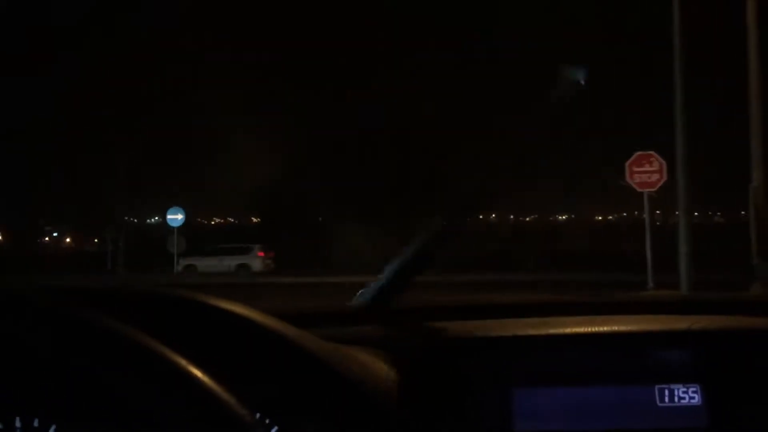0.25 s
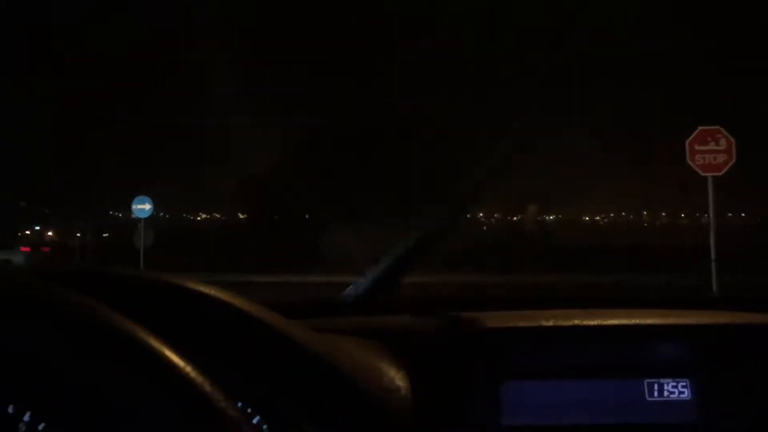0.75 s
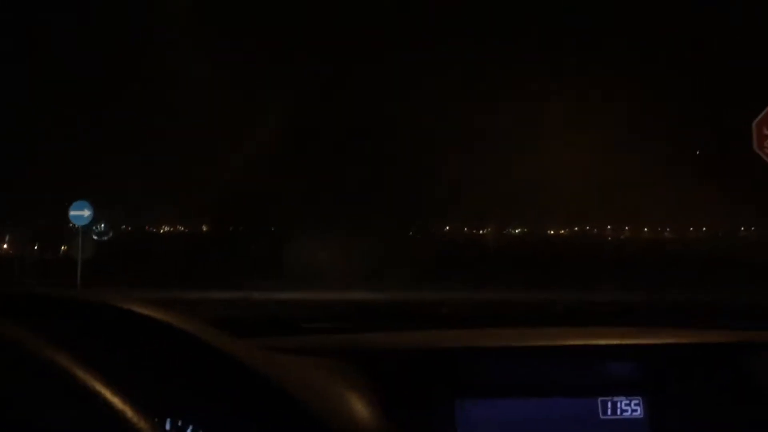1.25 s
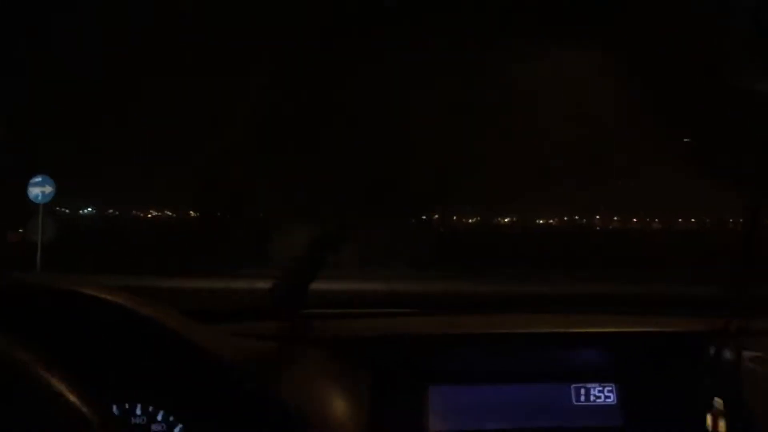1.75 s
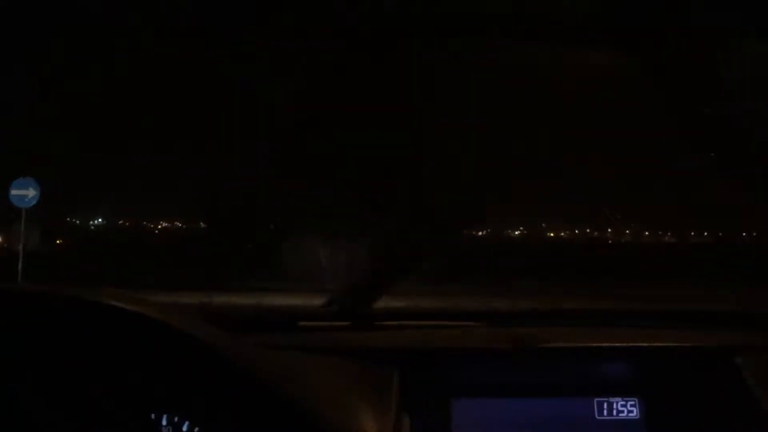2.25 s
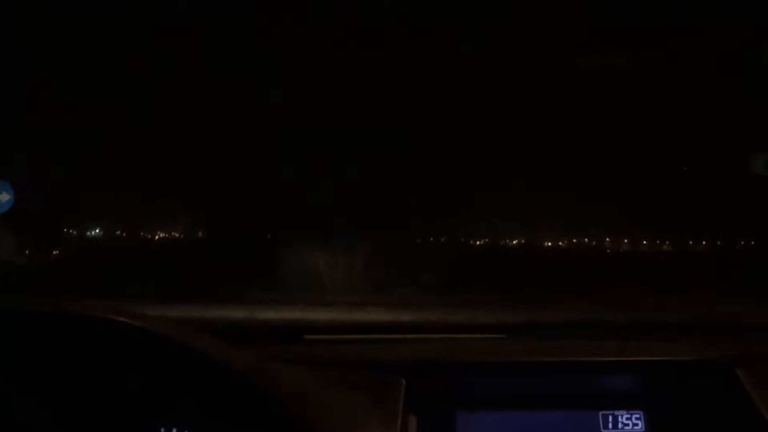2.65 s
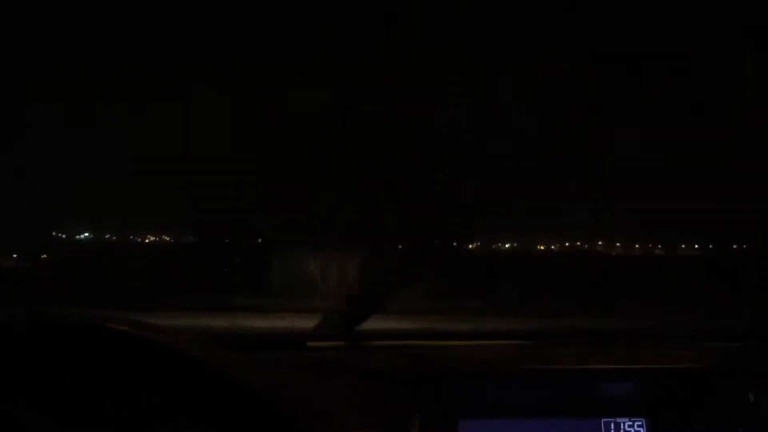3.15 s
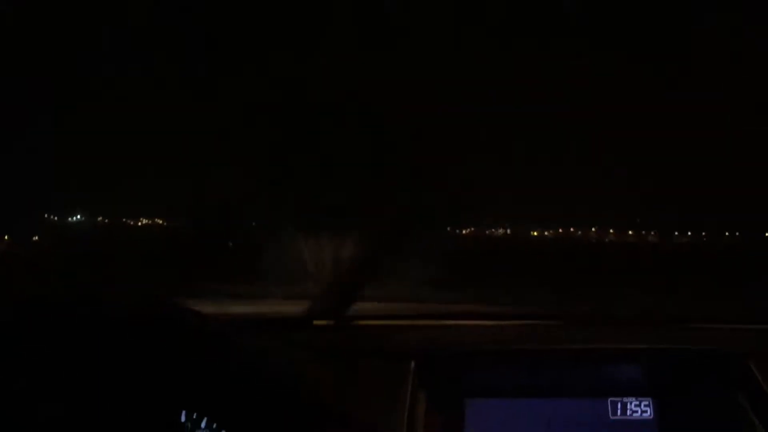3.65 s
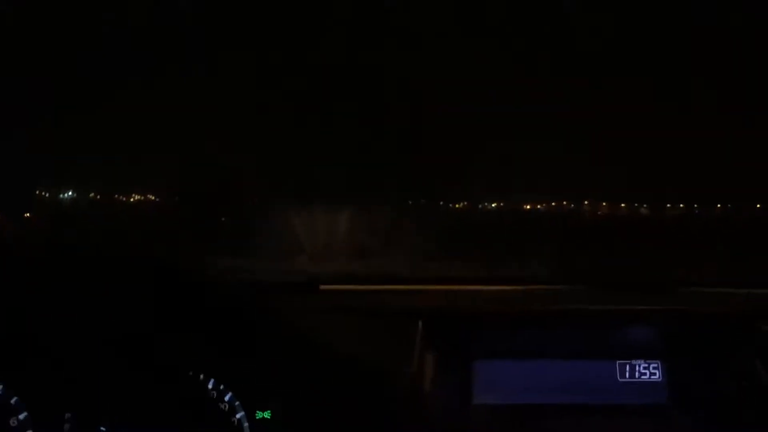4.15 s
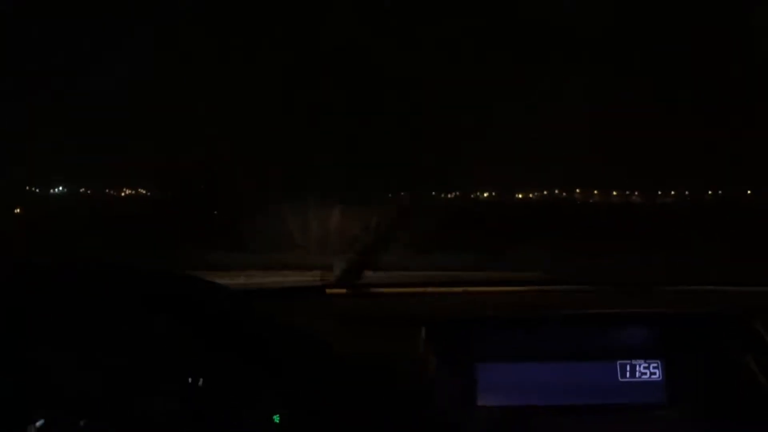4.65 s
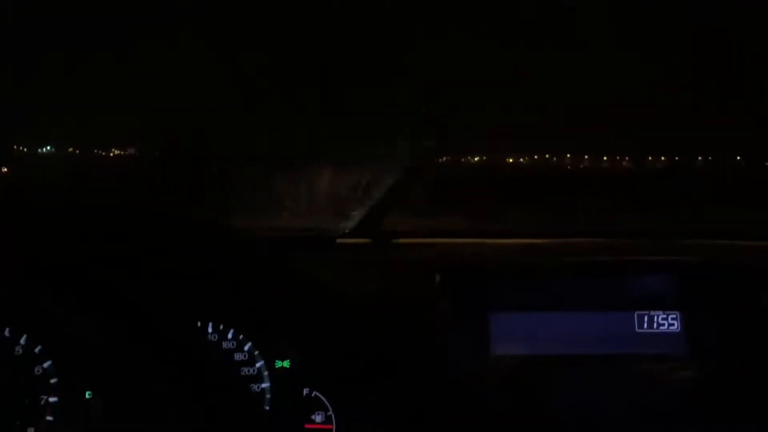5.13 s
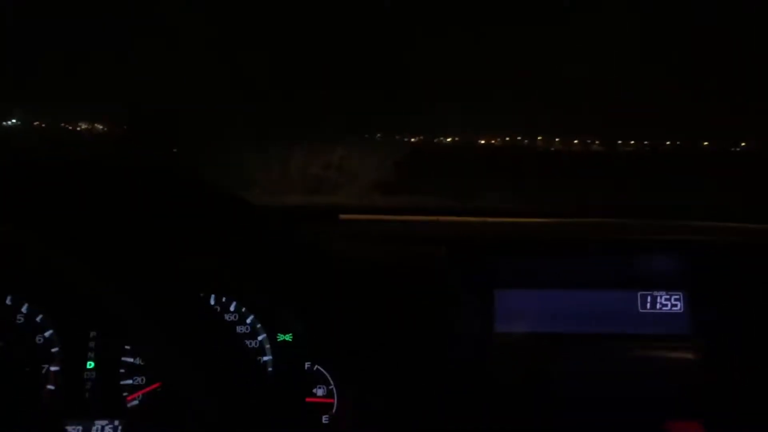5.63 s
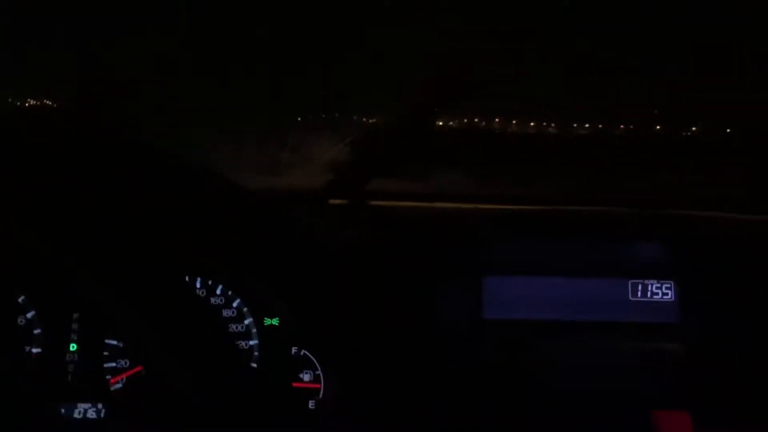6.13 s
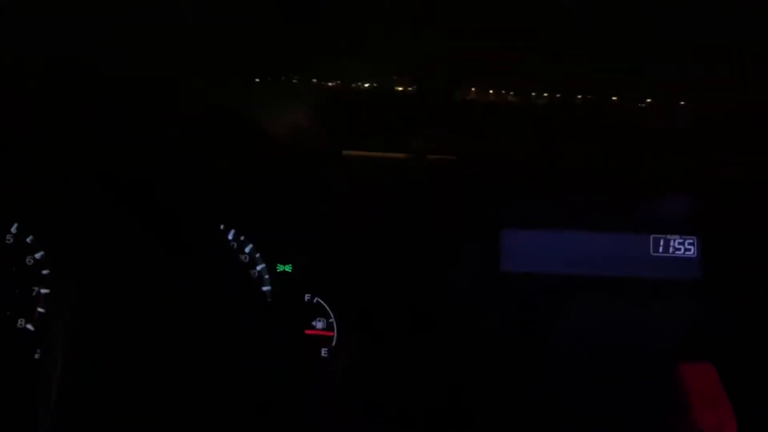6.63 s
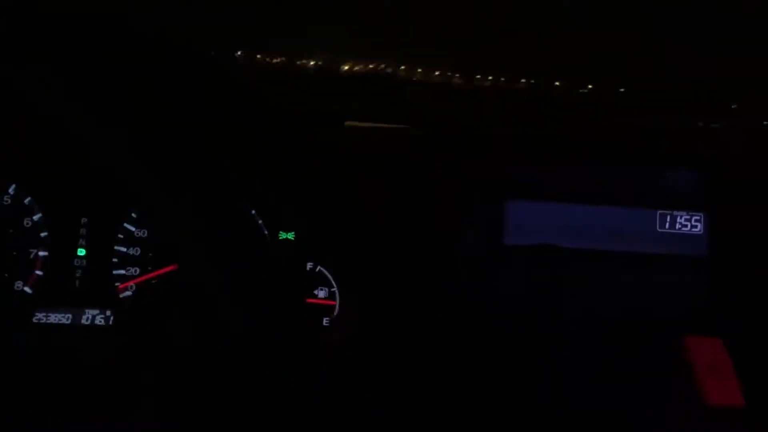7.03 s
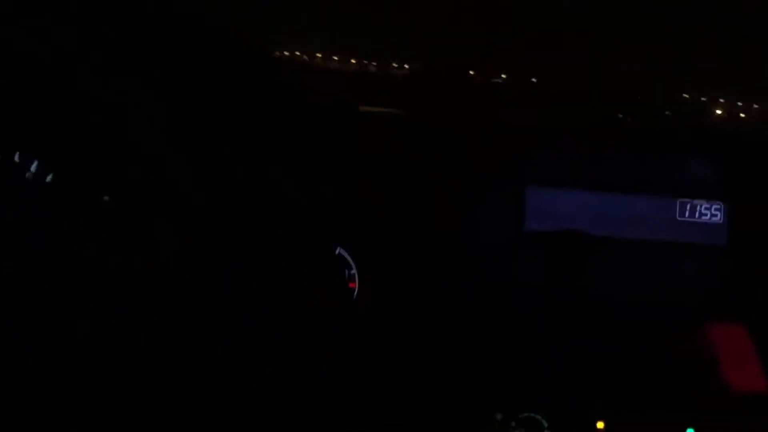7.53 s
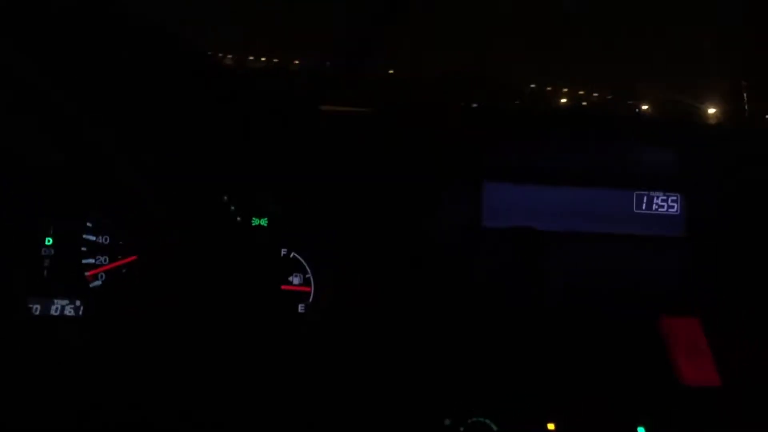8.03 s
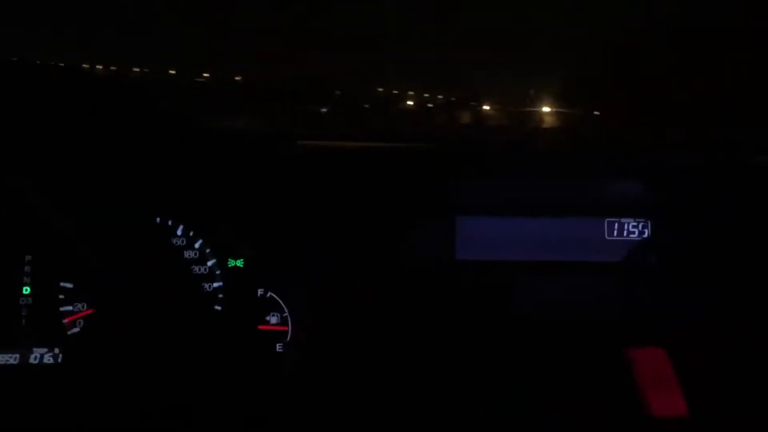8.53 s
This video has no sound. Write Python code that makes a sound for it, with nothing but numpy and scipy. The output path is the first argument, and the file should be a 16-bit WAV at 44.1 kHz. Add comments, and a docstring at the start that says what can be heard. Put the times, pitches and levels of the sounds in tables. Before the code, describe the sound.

A car cabin at night, captured by a phone near the driver. Heavy drops crackle densely on the glass at first, then rain becomes patchier, with soft splats and roof patter. Regular wiper knocks shake the panels with rubbery scuffs. Beneath, tyres rumble and a tonal hum falls in pitch and fades; the engine dips low, then climbs again towards the end.

```python
"""Rainy night drive

Inside a car that slows at a junction and pulls away again: tyres rumble and their tread hum sinks in pitch.
The engine drones as a stack of sine tones, and small metal pieces jingle faintly as fading high tones.
Wipers thump and scuff at each end of their sweep: short pushes and noise that shake the car's panels.
Rain patters on the roof and ticks on the windscreen: many short noise bursts, each with its own ring."""
import sys
import numpy as np
from scipy import signal
from scipy.fft import rfft, irfft
from scipy.io import wavfile
from scipy.ndimage import uniform_filter1d

SR = 44100
rng = np.random.default_rng(int(sys.argv[2]) if len(sys.argv) > 2 else 0)


def store_pcm(level_fs):
    """Save levels as 16-bit WAV."""
    pcm = np.round(np.clip(level_fs, -1, 1) * 32767).astype(np.int16)
    wavfile.write(sys.argv[1], SR, np.atleast_2d(pcm).T)


N = 387198
TIME = np.arange(N) / SR  # seconds


def undb(db):
    """Turn decibels into gain."""
    return 10 ** (np.asarray(db) / 20)


def unit(x):
    """Scale a sound to an rms of 1."""
    return x / np.sqrt(np.mean(x ** 2))


def unit_energy(x):
    """Scale a short sound to an energy of 1."""
    return x / np.linalg.norm(x)


def curves(table):
    """Draw straight lines between the rows of a table: one value per sample for each column."""
    seconds, *columns = np.transpose(table)
    return [np.interp(TIME, seconds, column) for column in columns]


def add(out, seconds, sound):
    """Mix a sound in at a given time."""
    start = int(np.clip(seconds * SR, 0, N - 1))
    out[start:start + len(sound)] += sound[:N - start]


def walk(rate):
    """Smooth random wander with a spread of about 1; a higher rate wanders faster."""
    hold = int(SR / rate)
    steps = np.repeat(rng.standard_normal(N // hold + 1), hold)
    smooth = uniform_filter1d(uniform_filter1d(steps, hold), hold)
    return unit(smooth[:N])


def fade(t, t60):
    """Exponential decay that falls by 60 dB in t60 seconds."""
    return np.exp(-np.log(1000) * t / t60)


def swell(seconds, spread_s):
    """A bell-shaped rise and fall around a time."""
    return np.exp(-np.minimum(((TIME - seconds) / spread_s) ** 2 / 2, 20))


def lowpass(x, order, hz):
    """Soften the sound above a frequency."""
    return signal.sosfilt(signal.butter(order, hz, fs=SR, output="sos"), x)


def highpass(x, order, hz):
    """Thin out the sound below a frequency."""
    return signal.sosfilt(signal.butter(order, hz, "high", fs=SR, output="sos"), x)


def colour(x, points, size=8192):
    """Filter with the given (frequency, level) outline and unit power gain, never sounding ahead of time."""
    hz, db = np.transpose(points)
    grid = np.maximum(np.arange(size // 2 + 1) * SR / size, 1)
    outline_db = np.interp(np.log(grid), np.log(hz), db)
    # folding the cepstrum forward puts the response as early as it can be
    cepstrum = irfft(np.log(undb(outline_db)))
    cepstrum[1:size // 2] *= 2
    cepstrum[size // 2 + 1:] = 0
    response = irfft(np.exp(rfft(cepstrum)))
    return signal.fftconvolve(x, unit_energy(response))[:len(x)]


def resonance(x, hz, width_hz):
    """One damped ringing tone (a mode), with unit power gain."""
    b, a = signal.iirpeak(min(hz, .45 * SR), hz / width_hz, fs=SR)
    return signal.lfilter(b, a, x) * np.sqrt(SR / (np.pi * width_hz))


# how loud the road is, before a small lift and wander: (time [s], level [dB])
ROAD_LEVEL = [(0, -27), (0.7, -30.5), (1.25, -26.5), (1.7, -30), (2.2, -30), (3.8, -34), (5.3, -37),
              (5.9, -32.5), (6.3, -36), (6.9, -31.5), (7.5, -34), (8.3, -33.5), (8.78, -32)]
# tone of the rumble inside the car: (frequency [Hz], level [dB])
ROAD_COLOUR = [(20, -20), (35, 1), (50, 0.5), (65, 1.5), (85, -4.5), (120, 2.5), (150, -4.5), (210, -12.5),
               (300, -21), (390, -18.5), (600, -30), (1200, -42), (4000, -69.5), (16000, -66.5)]


def tyres():
    """The rough road shakes the tyres at random, and the body passes on mostly the lows."""
    level_db, = curves(ROAD_LEVEL)
    rumble = colour(rng.standard_normal(N), ROAD_COLOUR)
    return rumble * undb(level_db + 1.5 + 1.0 * walk(9.1))


# tread tones at the starting speed, before the gains below: (frequency [Hz], level [dB])
TREAD_TONES = [(362, -54), (388, -50.5), (410, -47), (470, -52), (525, -49.5), (575, -59), (650, -48.5)]
# the tread hum builds up as the brakes bite: (time [s], level [dB])
BRAKING = [(0, -15), (0.3, -4), (0.6, 2.5), (1.0, 0.5), (2.0, -1.5), (2.7, -7)]
SLOWING_PER_S = 0.14  # share of the starting speed lost each second
BOOM_HZ, BOOM_WIDTH_HZ = 380, 120  # the cabin resonance that brings the hum out


def tread():
    """Tread tones sink as the car slows; each is stronger when near a cabin resonance."""
    speed = np.maximum(1 - SLOWING_PER_S * TIME, .3)  # share of the starting speed
    hum = 0
    for start_hz, level_db in TREAD_TONES:
        hz = start_hz * speed * (1 + .008 * walk(18))
        boom = 1 / np.hypot(1, 2 * (hz - BOOM_HZ) / BOOM_WIDTH_HZ)
        tone = np.sin(2 * np.pi * np.cumsum(hz) / SR)
        hum = hum + undb(level_db + 2.2 * walk(9.87)) * speed * boom * tone
    braking_db, = curves(BRAKING)
    return np.sqrt(2) * hum * undb(braking_db)


# engine: (time [s], firing rate [Hz], level [dB], extra level of the overtones [dB])
ENGINE = [(0, 73.05, -34, -1.5), (.7, 67, -38, 5.5), (2.25, 75.8, -35.5, -8.5), (3, 75.23, -30, -8.5),
          (3.3, 69.56, -34, -7), (3.7, 60.1, -46, 1), (4.5, 55.03, -43.5, 4), (5.1, 53.98, -36, -5),
          (5.9, 59.73, -39, 7), (6.4, 62.08, -29.5, -4.5), (6.9, 63.23, -32, -8.5),
          (7.5, 62.27, -30.5, -20), (8.15, 71.7, -32, -10), (8.45, 84.8, -34.5, -6.5),
          (8.78, 86.8, -30.5, -29)]
# engine orders: (multiple of the firing rate, level [dB])
ENGINE_ORDERS = [(1, 0), (2, -7.5), (3, -12), (4, -15.5)]
DRONE_HZ, DRONE_WIDTH_HZ, DRONE_DB = 244.3, 22, 6  # a cabin resonance lifts any order passing through


def engine():
    """Each firing pushes the air, so the firing rate and its multiples boom in the cabin."""
    firing_hz, level_db, overtones_db = curves(ENGINE)
    phase = 2 * np.pi * np.cumsum(firing_hz * (1 + 0.0071 * walk(14))) / SR
    drone = 0
    for multiple, order_db in ENGINE_ORDERS:
        waver_db = 2.1 * walk(9)
        off_centre = 2 * (multiple * firing_hz - DRONE_HZ) / DRONE_WIDTH_HZ
        boom_db = DRONE_DB / (1 + off_centre ** 2)
        tone_db = level_db + order_db + overtones_db * (multiple > 1) + boom_db + waver_db
        drone = drone + undb(tone_db) * np.sin(multiple * phase)
    return np.sqrt(2) * drone


# faint jingles of small metal pieces: (time [s], energy [dB])
TINKLES = [(3.495, -25.5), (3.512, -32), (3.549, -25.5), (4.144, -28), (4.163, -31), (4.232, -31),
           (4.863, -25), (5.438, -30)]
# ringing tones of the metal: (frequency [Hz], level [dB], time to fall 60 dB [s])
METAL_MODES = [(5450, -5, .04), (6100, -7, .04), (6662, -5, 0.078), (8550, -1, .02), (9100, 5, 0.028),
               (9450, -1, .02), (9940, 2, .04), (10600, -2, .022), (11100, -2, .022), (11750, -9, .025),
               (12500, -9, .025), (13300, -10, .03), (15000, -12, .025)]
METAL_SCATTER_DB = 5  # every touch favours other modes
METAL_DETUNE = 0.022  # the pieces differ a little in pitch, as a share
METAL_ECHO_T60_S = 0.02  # the cabin blurs their ring


def tinkles():
    """Small pieces of metal touch and ring briefly in many high modes."""
    hz, mode_db, t60 = np.transpose(METAL_MODES)[:, :, None]
    t = TIME[:SR // 5]
    out = np.zeros(N)
    for seconds, energy_db in TINKLES:
        size, detune, angle = rng.standard_normal((3, len(hz), 1))
        phase = 2 * np.pi * (hz * (1 + METAL_DETUNE * detune) * t + angle)
        gains = undb(mode_db + METAL_SCATTER_DB * size)
        ring = np.sum(gains * fade(t, t60) * np.sin(phase), axis=0)
        echo = rng.standard_normal(len(t)) * fade(t, METAL_ECHO_T60_S)
        ring = signal.fftconvolve(ring, echo)
        add(out, seconds, unit_energy(ring) * undb(energy_db))
    return out


def ringing(hz, width_hz, t60, rise_s, size=6000):
    """A short burst of shaking around one pitch: it rises steadily, then dies away."""
    t = np.arange(size) / SR
    edges = [hz - width_hz / 2, hz + width_hz / 2]
    band = signal.butter(2, edges, "band", fs=SR, output="sos")
    shaking = unit(signal.sosfilt(band, rng.standard_normal(size)))
    return shaking * np.minimum(t / rise_s, fade(t - rise_s, t60))


# soft splats of water on the body: (time [s], level [dB], pitch [Hz], rise [s])
SPLATS = [(0.13, -38, 1250, 0.026), (1.437, -36.5, 1320, .002), (1.75, -43.5, 1190, 0.012),
          (2.8, -43, 1290, .008), (3.675, -41, 1302, .01), (4.89, -38, 2100, 0.011),
          (4.955, -43, 1460, 0.0049), (6.078, -40, 1310, 0.011), (6.458, -34, 1142, 0.014),
          (7.289, -45, 1000, 0.0043), (7.789, -39, 1303, 0.013), (7.865, -45, 1200, 0.019),
          (8.012, -36.5, 1270, 0.027), (8.38, -32.5, 1500, 0.0065), (8.405, -41, 1140, .006)]


def splats():
    """Larger blobs of water spread softly on the body and ring it in a broad band."""
    out = np.zeros(N)
    for seconds, level_db, hz, rise_s in SPLATS:
        splat = ringing(hz, width_hz=1070, t60=0.12, rise_s=rise_s)
        add(out, seconds, splat * undb(level_db))
    return out


# wiper turns, top and bottom of the sweep in alternation; also used by wipers():
# (time [s], force of the knocks and drag [dB], force of the scuffs [dB])
TURNS = [(0.697, 1, -6), (1.414, -2, -2.5), (2.163, -1, -3.5), (2.88, -3, -1.5), (3.629, 0, 1),
         (4.346, -2.5, -1), (5.095, -1, -1), (5.812, 0.5, -3.5), (6.561, 1.5, 1.5), (7.278, -1, 0),
         (8.027, 0.5, 3), (8.744, -0.5, 0)]
# scuffs around each turn, before its force: (time after the turn [s], level [dB], spread [s])
SCUFFS = [(-.17, -53, 0.036), (-.087, -42.5, .012), (-.002, -39.5, .02)]
# tone of the scuffs: (frequency [Hz], level [dB])
SCUFF_COLOUR = [(200, -32.5), (330, -1.5), (450, 1.5), (560, -1.5), (720, -9), (1000, -9.5), (1500, -15.5),
                (2500, -26), (6000, -35), (16000, -60)]
SCUFF_SLIPS_PER_S = 1500


def scuffs():
    """The rubber lips flip over in a rush of tiny slips on the wet glass."""
    slips = rng.standard_normal(N) * (rng.random(N) < SCUFF_SLIPS_PER_S / SR)
    force = np.zeros(N)
    for turn, _, force_db in TURNS:
        for after, level_db, spread_s in SCUFFS:
            force += undb(level_db + force_db) * swell(turn + after, spread_s)
    return colour(unit(slips), SCUFF_COLOUR) * force


# ringing tones of the cowl (the panel under the wipers) and cabin:
# (frequency [Hz], width [Hz], level at the top turn [dB], level at the bottom turn [dB])
COWL_MODES = [(89, 29, -7, 0), (125.7, 22.3, 8, 4), (168, 24, -5.5, 3), (242.6, 21, -23, -2),
              (374, 120, -14, -4.5), (530, 210, -17, -11)]


def cowl(push, mode_db):
    """The cowl and cabin answer a push from the wipers in several modes."""
    gains = unit_energy(undb(mode_db))
    return sum(gain * resonance(push, hz, width_hz)
               for (hz, width_hz, *_), gain in zip(COWL_MODES, gains))


def judder(mode_db):
    """Rubber stutters on the glass in random kicks and shakes the cowl with an even force."""
    kicks = rng.standard_normal(N) * (rng.random(N) < 500 / SR)  # about 500 a second
    shake = cowl(kicks, mode_db)
    return shake / np.sqrt(uniform_filter1d(shake ** 2, int(.06 * SR)) + 1e-12)


# drag of the blades before the turn's force: (level at the top turn [dB], level at the bottom turn [dB])
DRAG_LEVELS = [-27, -32.5]
# knocks of linkage, arms and blades, one list for the top turn and one for the bottom turn,
# before the force, lift and scatter: (time after the turn [s], energy [dB])
KNOCKS = [
    [(-0.081, -7), (-0.0235, 2), (0.0008, 4), (0.0165, -1), (0.052, -1)],
    [(-0.099, -10), (-0.022, -0.5), (-0.005, -6.5), (0.0115, 1.5), (0.05, -17)],
]
DRAG_LEAD_S, DRAG_SPREAD_S = 0.036, 0.089  # the drag peaks just before the turn
KNOCK_LIFT_DB, KNOCK_SCATTER_DB, KNOCK_JITTER_S = 4, 1.0, 0.00038
RUBBER_SOFT_HZ = 290  # the sound is softened above this


def wipers():
    """The blades drag as they slow down, then arms and blades knock over at each end of the sweep."""
    _, _, *mode_db = np.transpose(COWL_MODES)
    out = np.zeros(N)
    for end, (drag_db, knocks, end_db) in enumerate(zip(DRAG_LEVELS, KNOCKS, mode_db)):
        pushes, drag = np.zeros(N), np.zeros(N)
        for turn, force_db, _ in TURNS[end::2]:
            chances = rng.standard_normal((len(knocks), 2))
            for (after, energy_db), (late, hard) in zip(knocks, chances):
                if turn + after < N / SR:
                    push_db = energy_db + force_db + KNOCK_LIFT_DB + KNOCK_SCATTER_DB * hard
                    add(pushes, turn + after + KNOCK_JITTER_S * late, undb([push_db]))
            drag += undb(drag_db + force_db) * swell(turn - DRAG_LEAD_S, DRAG_SPREAD_S)
        out += cowl(pushes, end_db) + drag * judder(end_db)
    return lowpass(out, 3, RUBBER_SOFT_HZ)


# light rain that goes on in the lulls, before the trims below:
# (time [s], level on the glass [dB], level on the roof [dB])
DRIZZLE = [(0, -61, -55), (1.2, -66, -55), (1.5, -59, -52.5), (1.8, -62, -58), (2.2, -55, -56),
           (2.55, -64, -59), (2.75, -72, -59), (3.8, -66, -52.5), (5.2, -69, -55), (6.4, -60, -52),
           (7.5, -63, -55), (7.85, -59.5, -51), (8.78, -56, -55)]
# flurries with short lulls between, before the trims below:
# (start time [s], length [s], level on the glass [dB], level on the roof [dB])
FLURRIES = [(0.01, 0.037, -51, -67), (0.129, 0.085, -47.5, -48.5), (0.246, 0.48, -46.5, -52.5),
            (0.739, 0.17, -52, -54), (0.941, 0.25, -48, -49), (1.194, 0.035, -66, -52),
            (1.269, 0.12, -51, -62), (1.44, 0.16, -54, -47.5), (1.96, 0.14, -47, -49),
            (2.203, 0.056, -43, -54), (2.31, 0.1, -49.5, -48.5), (2.625, 0.01, -50, -52.5),
            (2.78, 0.14, -48, -47.5), (2.942, 0.083, -46.5, -46), (3.049, 0.2, -49, -48),
            (3.307, 0.068, -43.5, -47), (3.42, 0.078, -66, -45), (3.612, 0.17, -64, -49),
            (3.822, 0.095, -49.5, -49), (3.926, 0.15, -52, -47.5), (4.084, 0.27, -54, -48.5),
            (4.407, 0.08, -56, -48.5), (4.565, 0.15, -55.5, -54), (4.752, 0.097, -65, -51.5),
            (4.872, 0.18, -59, -50.5), (5.223, 0.27, -67, -59.5), (5.458, 0.098, -53.5, -61),
            (5.6, 0.19, -55, -50.5), (5.869, 0.15, -60.5, -49.5), (6.074, 0.04, -47.5, -42.5),
            (6.442, 0.29, -60, -50), (6.812, 0.21, -55, -49.5), (7.11, 0.26, -66, -49),
            (7.547, 0.028, -57, -46.5), (7.67, 0.019, -46, -56), (7.798, 0.055, -74, -50.5),
            (7.988, 0.18, -52.5, -52), (8.281, 0.64, -58, -49)]
FLURRY_ATTACK_S, FLURRY_RELEASE_S = 0.011, 0.028
PATCHY_DB, PATCHY_PER_S = 2, 25  # the rain comes unevenly
GLASS_TRIM_DB, ROOF_TRIM_DB = -1.13, -1.0


def rainfall():
    """Rain level in dB on glass and roof: drizzle plus flurries that set in quickly, hold and die away."""
    power = undb(curves(DRIZZLE)) ** 2
    for start, length, glass_db, roof_db in FLURRIES:
        end = start + length
        corners = [start - FLURRY_ATTACK_S, start, end, end + FLURRY_RELEASE_S]
        shape = np.interp(TIME, corners, [0, 1, 1, 0])
        power += np.outer(undb([glass_db, roof_db]) ** 2, shape ** 2)
    glass_db, roof_db = 10 * np.log10(power) + PATCHY_DB * walk(PATCHY_PER_S)
    return glass_db + GLASS_TRIM_DB, roof_db + ROOF_TRIM_DB


def impact(tail_db, low_t60, high_t60, notes_db, lowest_hz, size=4096, count=3):
    """One drop: a sharp crack, then the panel and cabin ring with separate decays for lows and treble."""
    t = np.arange(size) / SR
    crack, ring, spray = rng.standard_normal((3, size))
    crack = crack * fade(t, .0034)
    tail = lowpass(ring, 2, 5000) * fade(t, low_t60) + 0.39 * spray * fade(t, high_t60)
    hit = unit_energy(crack) + undb(tail_db) * unit_energy(tail)
    # every spot on the panel favours a few notes of its own
    notes_hz = lowest_hz * 7 ** rng.random(count)
    hit = hit + undb(notes_db) * sum(resonance(hit, hz, hz / 12) for hz in notes_hz)
    # bending waves travel slower at low pitch, so the lows arrive a little late
    lag = np.sqrt(np.arange(size + 1) * SR / (2 * size) / 450)
    hit = irfft(rfft(hit, 2 * size) * np.exp(-1j * lag))[:size]
    return unit_energy(hit)


def shower(level_db, per_second, scatter_db, spots):
    """Drops of scattered size fall at random on the spots of a panel, each with its own ring."""
    chance = rng.random((int(per_second * N / SR), 3))
    when = (chance[:, 0] * N).astype(int)
    spot = (chance[:, 1] * len(spots)).astype(int)
    sizes = undb(scatter_db * np.minimum(-np.log(chance[:, 2]), 3.5))
    # the water arriving in any short while is shared out among its drops
    water = uniform_filter1d(np.bincount(when, sizes ** 2, N), int(.06 * SR))
    sizes = sizes / np.sqrt(water[when]) * undb(level_db[when])
    out = np.zeros(N)
    for k, ring in enumerate(spots):
        hits = np.bincount(when[spot == k], sizes[spot == k], N)
        out += signal.oaconvolve(hits, ring)[:N]
    return out


# tone of the roof: (frequency [Hz], level [dB])
ROOF_COLOUR = [(150, -2.5), (300, 1.5), (410, 8.5), (520, 5), (610, -3.5), (700, 0.5), (830, -3), (980, 0),
               (1150, 0), (1600, -2), (2200, -6), (3500, -9), (5000, -14.5), (8000, -24.5), (16000, -27)]


def roof(rain_db, count=32):
    """Drops strike the roof panel; a denser, duller patter comes through the lining."""
    spots = [impact(tail_db=6.5, low_t60=0.077, high_t60=0.052, notes_db=-17, lowest_hz=539)
             for _ in range(count)]
    return colour(shower(rain_db, per_second=600, scatter_db=4.0, spots=spots), ROOF_COLOUR)


# single heavy drops, before the tone of the glass: (time [s], energy [dB], treble tilt [dB])
DROPS = [(0.014, -19, 2), (0.0518, -15, 5), (0.135, -21, -12), (0.175, -16, 6), (0.204, -16.5, 12),
         (0.251, -12, 12), (0.271, -11, 6), (0.3006, -9, 5), (0.309, -8.5, 5), (0.377, -14, 10),
         (0.395, -9, 15), (0.4462, -11, 12), (0.452, -18, 12), (0.4717, -9, 2), (0.477, -11, 13),
         (0.512, -10.5, 20), (0.53, -17, -11), (0.5712, -12, 9), (0.583, -12.5, -5), (0.6053, -17, 18),
         (0.678, -18, 15), (0.6975, -8.5, 16), (0.702, -13.5, 12), (0.775, -19, 6), (0.804, -25, 14),
         (0.832, -22, -8), (0.85, -17, 8), (0.887, -17, 10), (0.9505, -10.5, 26), (0.967, -10, 16),
         (1.0158, -13.5, -16), (1.028, -16, -14), (1.04, -23, 14), (1.091, -24, 3), (1.1, -18.5, -4),
         (1.144, -19, -6), (1.178, -19.5, -15), (1.269, -19.5, 3), (1.282, -19, -2), (1.3092, -12, 4),
         (1.362, -14.5, 1), (1.425, -19.5, 6), (1.457, -31, 10), (1.477, -23, 12), (1.4917, -16.5, 11),
         (1.573, -19, 1), (1.5865, -6, 12), (1.654, -22, -9), (1.7121, -15, -8), (1.725, -17, 0),
         (1.9096, -18.5, -2), (1.932, -17.5, 10), (1.977, -26, -3), (1.986, -23, 4), (2.027, -13, 7),
         (2.046, -8, 5), (2.07, -18, 0), (2.115, -8, 6), (2.159, -20, -10), (2.208, -18, 16),
         (2.2176, -11.5, 16), (2.232, -11.5, 11), (2.267, -22, -5), (2.321, -20, -14), (2.357, -19, -2),
         (2.392, -23, -14), (2.411, -15, 5), (2.443, -12.5, -2), (2.47, -18, 2), (2.4963, -17, -4),
         (2.64, -19, -13), (2.665, -13, 0), (2.791, -21, 10), (2.841, -18, -2), (2.8662, -12.5, -14),
         (2.885, -13, -10), (2.945, -15.5, 6), (2.9514, -13, 1), (2.992, -13, -1), (3.002, -11, 4),
         (3.012, -14.5, 13), (3.068, -12, 9), (3.121, -17, -18), (3.1315, -15.5, -21), (3.182, -20.5, 6),
         (3.213, -22, -2), (3.224, -13.5, 8), (3.261, -17, -2), (3.314, -13, 13), (3.337, -18, -4),
         (3.383, -17, -6), (3.393, -18, -2), (3.421, -14, 7), (3.469, -18.5, -10), (3.612, -15.5, 17),
         (3.669, -24, -15), (3.6952, -13.5, -14), (3.819, -19.5, -9), (3.86, -18, 8), (3.872, -18, 10),
         (3.918, -22, -11), (3.953, -23, -5), (4.007, -16, -4), (4.019, -16, 12), (4.0662, -12.5, -12),
         (4.07, -17, 6), (4.1255, -19, -12), (4.3629, -14.5, -3), (4.413, -22.5, -13), (4.59, -19.5, -20),
         (4.686, -19.5, 12), (4.72, -19, -5), (4.8658, -12.5, 0), (4.883, -17.5, 8), (4.9843, -16.5, -8),
         (5.051, -19.5, -18), (5.184, -23, -12), (5.245, -25, -7), (5.315, -26.5, -18), (5.501, -17, 4),
         (5.532, -20.5, -12), (5.5924, -17, -24), (5.623, -14, -15), (5.633, -15.5, 3), (5.668, -21, -9),
         (5.772, -19, -21), (5.862, -19.5, 2), (5.955, -23, 8), (5.982, -20.5, -14), (6.1032, -14, -5),
         (6.242, -16, 4), (6.2613, -13.5, 2), (6.3171, -19, -3), (6.3541, -17.5, -17), (6.4, -19.5, -4),
         (6.416, -20, 14), (6.447, -11.5, 5), (6.495, -16.5, -25), (6.62, -19.5, -5), (6.642, -18, 16),
         (6.685, -16, -19), (6.889, -18, 8), (6.898, -15, 8), (6.962, -20, -1), (7.172, -17, 12),
         (7.1843, -7.5, 35), (7.244, -21, 8), (7.282, -20.5, -8), (7.6738, -5.5, 0), (7.84, -17.5, -3),
         (7.9459, -14.5, -9), (7.952, -16, -4), (7.974, -8.5, 10), (8.125, -19.5, 3), (8.292, -21, -8),
         (8.414, -15, 3), (8.47, -19, -13), (8.508, -20, -8), (8.557, -21, -10), (8.596, -18, -4),
         (8.66, -18.5, -6), (8.734, -16.5, -3), (8.755, -16.5, 5)]
# tone of the windscreen: (frequency [Hz], level [dB])
SCREEN_COLOUR = [(200, 9.5), (420, -2), (700, -2.5), (1200, 0), (2200, -0.5), (2800, 0), (4300, -1.5),
                 (4900, -5), (5600, -3), (7000, -6), (7800, -9.5), (9400, -8), (10400, -16.5), (11500, -12),
                 (16000, -19.5)]
SPRAY_DB, SPRAY_LOW_HZ = -7, 7500  # spray level against the rain, before its lows are cut below SPRAY_LOW_HZ


def windscreen(rain_db, count=24):
    """Drops strike the glass in bright ticks, with fine spray between and heavy drops standing out."""
    spots = [impact(tail_db=2.5, low_t60=0.055, high_t60=0.048, notes_db=-15, lowest_hz=2100)
             for _ in range(count)]
    out = shower(rain_db, per_second=185, scatter_db=5.5, spots=spots)
    # fine spray: fast bright ticks with a short hissing treble ring
    specks = [impact(tail_db=1, low_t60=0.02, high_t60=0.059, notes_db=-11, lowest_hz=2390)
              for _ in range(count // 2)]
    spray = shower(rain_db + SPRAY_DB, per_second=260, scatter_db=4.5, spots=specks)
    out += highpass(spray, 2, SPRAY_LOW_HZ)
    for seconds, energy_db, treble_db in DROPS:
        # bright drops land close by and are heard with less of the ring
        hit = impact(tail_db=0.5 - 0.12 * treble_db, low_t60=0.055, high_t60=0.043,
                     notes_db=-19, lowest_hz=2300)
        dull = lowpass(hit, 1, 4500)
        hit = dull + undb(treble_db) * (hit - dull)
        add(out, seconds, unit_energy(hit) * undb(energy_db))
    return colour(out, SCREEN_COLOUR)


def scene():
    """Everything as heard from the driver's seat."""
    glass_db, roof_db = rainfall()
    car = tyres() + tread() + engine() + tinkles()
    wiping = scuffs() + wipers()
    water = splats() + roof(roof_db) + windscreen(glass_db)
    return (car + wiping + water)[None]


def record(dry):
    """The phone drops the deepest bass and cuts the top."""
    thinned = highpass(dry, 3, 27)
    return signal.sosfilt(signal.ellip(8, .2, 70, 15750, fs=SR, output="sos"), thinned)


dry = scene()
out = record(dry)
store_pcm(out)
```